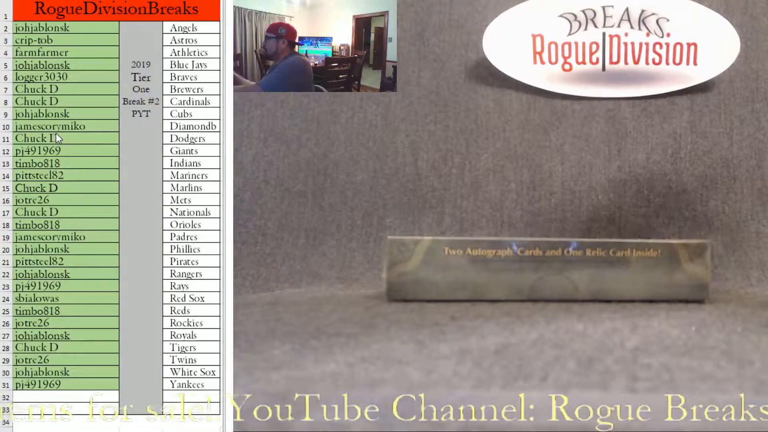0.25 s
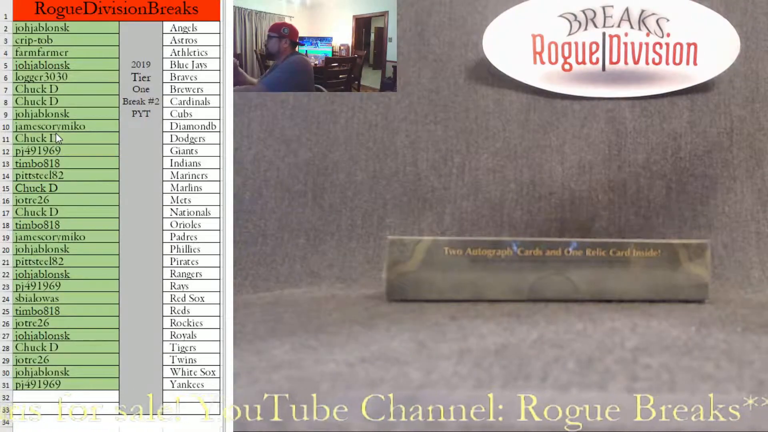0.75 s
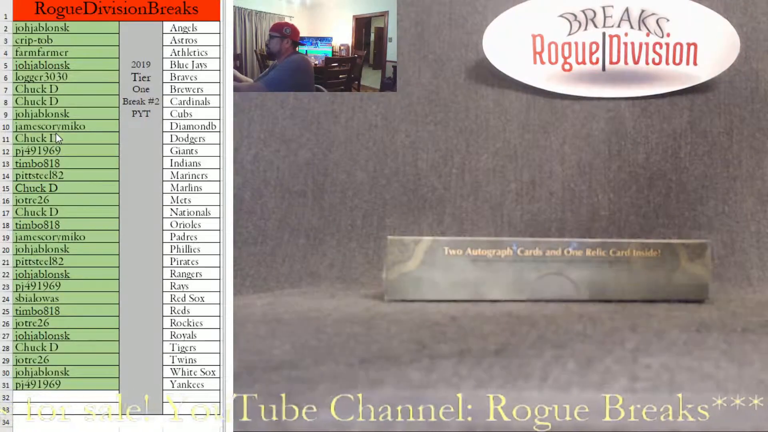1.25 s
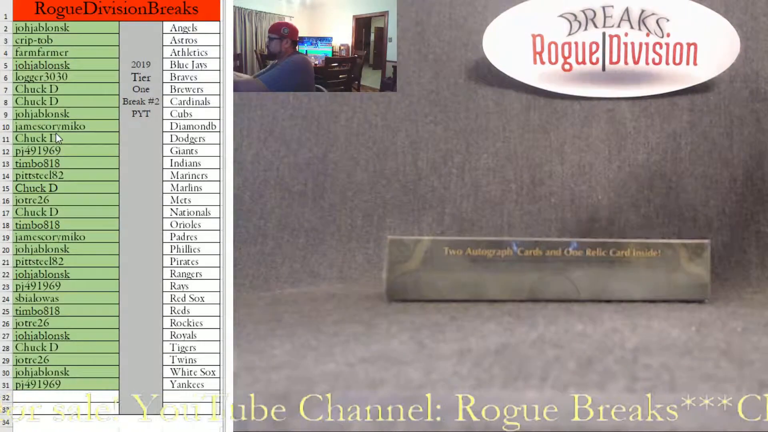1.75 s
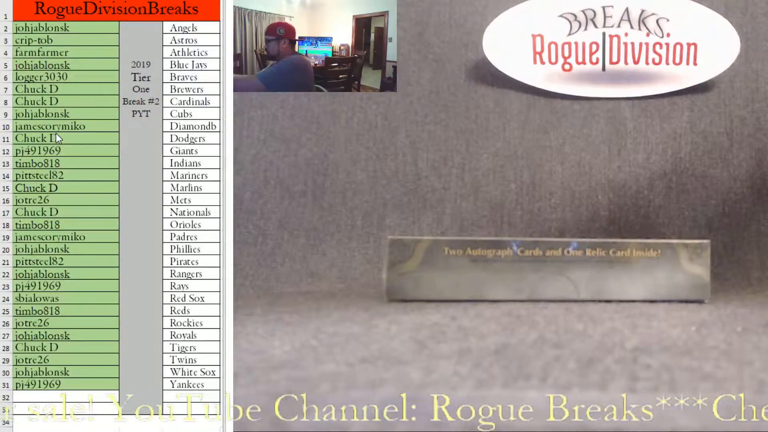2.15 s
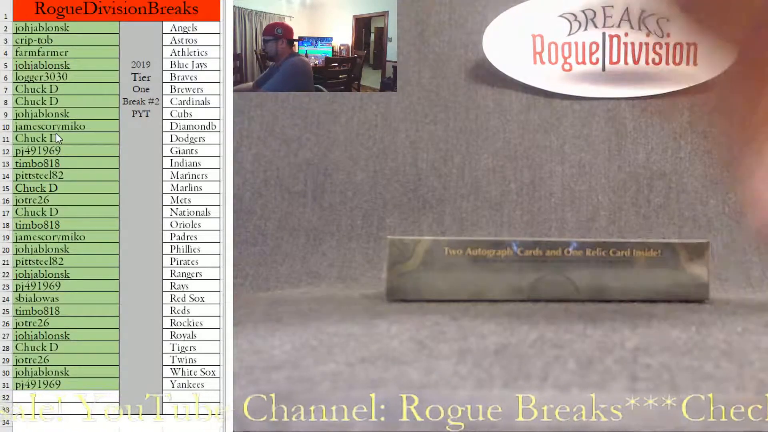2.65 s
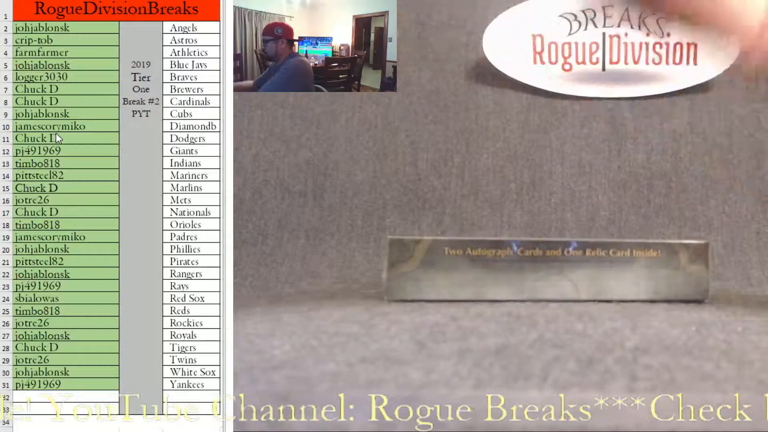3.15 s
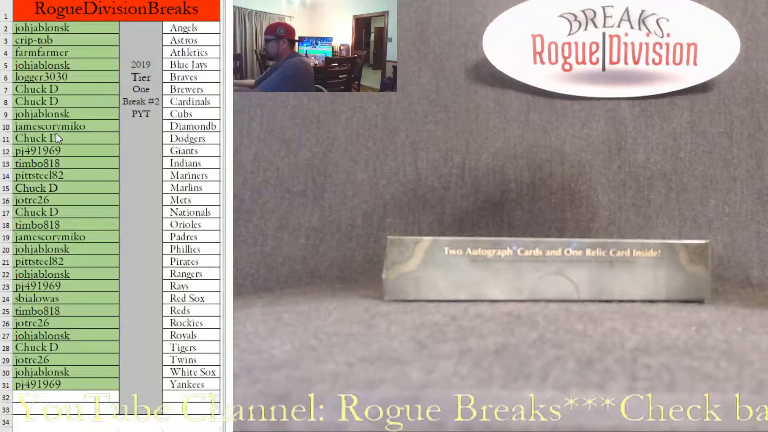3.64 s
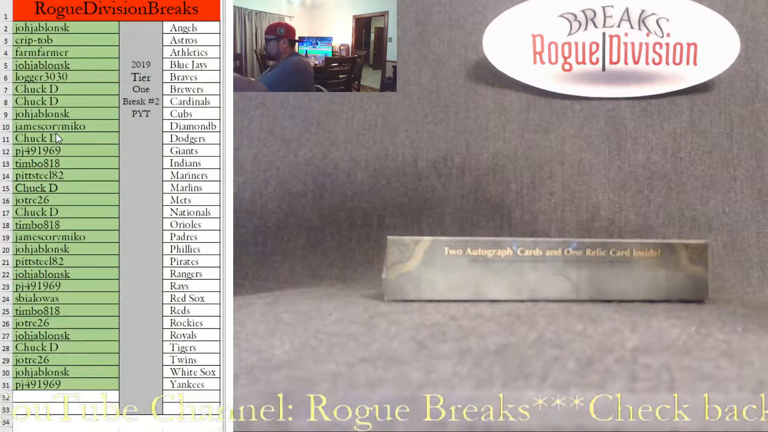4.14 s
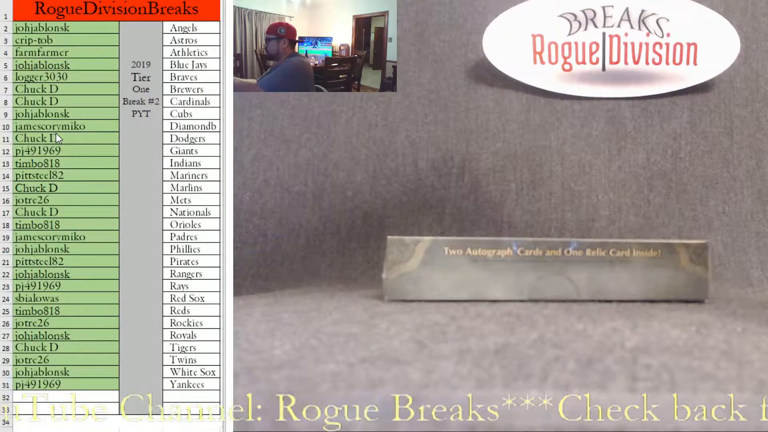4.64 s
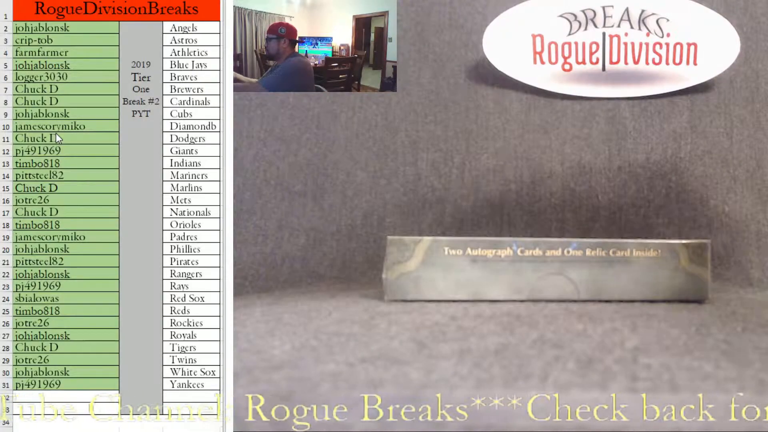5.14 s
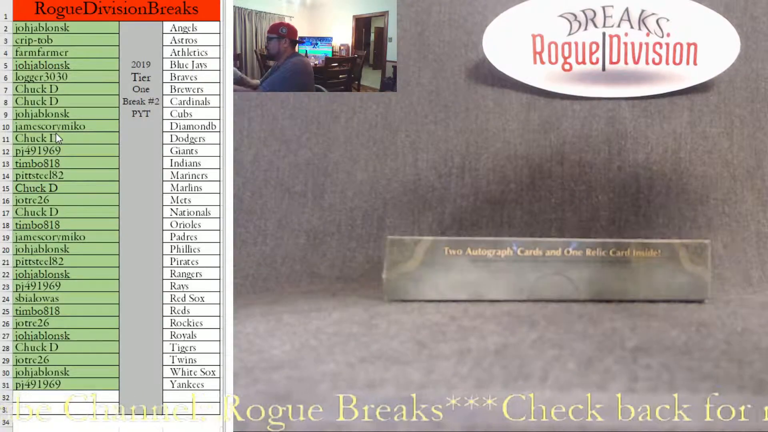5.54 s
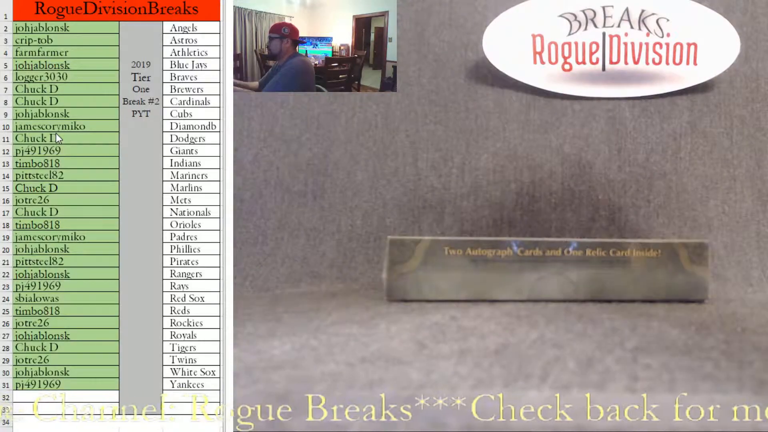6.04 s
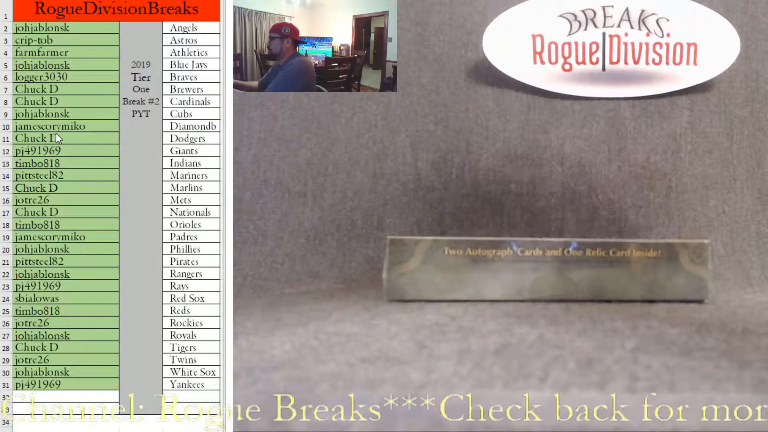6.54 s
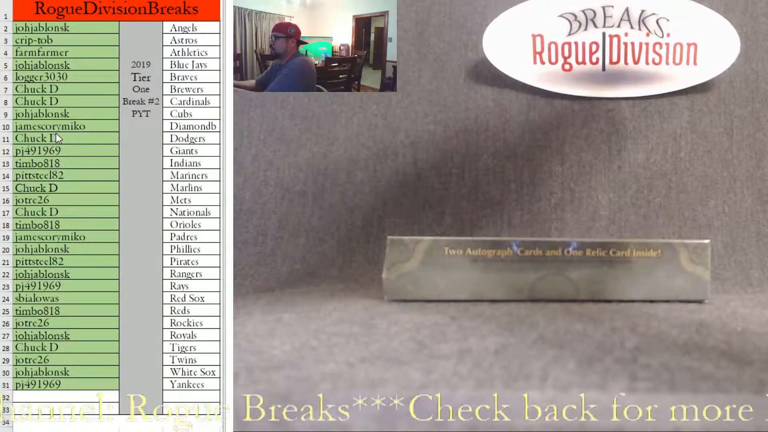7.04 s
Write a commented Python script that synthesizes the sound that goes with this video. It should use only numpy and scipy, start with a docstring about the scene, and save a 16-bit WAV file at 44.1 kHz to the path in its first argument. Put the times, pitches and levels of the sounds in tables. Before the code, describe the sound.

Thin rubber gloves crinkle and slide over hands, cuffs snapping sharply, one crack far loudest, above a low machine hum in a small room.

```python
"""Thin rubber gloves are pulled on close to a desk microphone in a small room with a steady machine hum.
First the film slides and crinkles over the skin (filtered grains of noise) and small folds flick open.
From 1.3 s the stretched cuff snaps back on the wrist (millisecond noise bursts). The hardest snap, at 2.2 s,
drives the recorder's limiter down, and the room swells back over most of a second. A hand wafts past at 2.9 s.
More snaps come around 5.1 to 5.4 s, then pulls and flicks to the end. Soft knocks and brief rings run between."""
import sys
import numpy as np
from scipy import signal
from scipy.fft import rfft, irfft
from scipy.io import wavfile
from scipy.ndimage import uniform_filter1d

SR = 44100
rng = np.random.default_rng(int(sys.argv[2]) if len(sys.argv) > 2 else 0)


def materialize(psi):
    """Save the field psi as 16-bit PCM at rate SR to the path in sys.argv[1].

    A 1-D psi becomes a single channel; in a 2-D psi each row is a channel.
    """
    bounded = np.clip(np.atleast_2d(psi).T, -1, 1)
    quanta = np.round(bounded * 32767).astype(np.int16)
    wavfile.write(sys.argv[1], SR, quanta)


N = 321489
T = np.arange(N) / SR  # time in seconds

# Levels in the tables are relative, because later steps may shift them.
# Cuff and fingertip snaps. Each row: start in seconds, level in dB, film pitch in Hz, spread in octaves,
# length in seconds, broad slap on the skin in dB, share sent to the room in dB.
SNAPS = [(1.2608, -16.5, 4940, 0.68, 0.0032, -2, 3), (1.272, -7, 4240, 0.5, 0.0026, -6, -14),
         (1.2862, -2, 5000, 0.77, 0.0023, -9, -4), (1.3377, -2, 7780, 0.43, 0.0044, -4, -5),
         (1.357, -12.5, 8040, 0.39, 0.0033, -11, 3.5), (1.682, -7, 6900, 0.72, 0.009, -17, -2.5),
         (1.984, -12.5, 4900, 0.74, 0.0073, -13, -1.5), (2.2125, -8.5, 6000, 0.58, 0.0017, -15, -9),
         (2.246, 20, 6600, 0.55, 0.002, -9, -12), (2.275, -10, 6500, 0.54, .0015, -18, -10),
         (3.595, -20.5, 6700, 1.6, 0.0036, -7, 0.5), (5.1298, -27, 8500, 0.79, .001, -30, -8),
         (5.1533, -17.5, 7340, 0.75, 0.0029, -18, -5.5), (5.1538, -21.5, 2870, 0.25, 0.0023, -20, -13),
         (5.4296, -8, 9050, 0.18, 0.00081, -19.5, -7), (5.4363, -7.5, 5830, 1.24, 0.0047, -11, -2)]
# Folds flicking open. Each row: start in seconds, level in dB, film pitch in Hz, low-mid share in dB.
FLICKS = [(0.142, -25, 7000, -30), (0.205, -26.5, 4600, -30), (0.408, -22, 6100, -12),
          (0.587, -20.5, 7200, -9), (1.066, -17.5, 5800, -4), (1.1675, -20.5, 4640, -30),
          (1.231, -21.5, 5000, -10), (1.468, -15, 4520, -14), (1.5286, -18.5, 5450, -9),
          (1.655, -19.5, 6330, -25), (2.345, -18.5, 3040, -22), (2.4057, -20, 5990, -24),
          (3.271, -12.5, 7100, -11.5), (3.458, -31.5, 11500, -30), (3.5118, -23.5, 6900, -10),
          (3.6141, -12, 6300, -19), (3.7025, -25.5, 7900, -11), (3.8152, -24, 6300, -30),
          (3.8718, -22.5, 9200, -30), (3.904, -29.5, 5770, -17), (4.359, -18, 11000, -10.5),
          (4.3714, -19.5, 6100, -20), (4.7833, -21, 6950, -36), (4.88, -28.5, 8100, -25),
          (5.2894, -25, 6880, -7), (5.323, -22.5, 9100, -23), (5.3647, -20, 8300, -21),
          (5.8407, -23, 8100, -14), (5.956, -16.5, 6200, -15), (5.9654, -20.5, 8000, -15),
          (6.1735, -23.5, 8250, -14), (6.199, -19, 9300, -17), (6.2284, -26, 7560, -7),
          (6.269, -23.5, 7040, -10), (7.1267, -22.5, 7300, -23)]
# Pulls of the film over the skin. Each row: start in seconds, length in seconds, swish level in dB,
# tightness (drag over swish) in dB.
PULLS = [(0.0, .16, -45.5, -11), (0.338, 0.3, -46.5, -11.5), (0.748, 0.06, -54.5, -8),
         (0.937, 0.13, -46.5, -8.5), (1.08, 0.15, -40.5, -5), (1.249, 0.097, -28.5, -9),
         (1.359, .11, -35.5, -6.5), (1.472, 0.25, -46.5, -2.5), (1.906, 0.098, -42.5, -3.5),
         (2.119, .12, -46, 3), (2.806, 0.063, -48.5, -5), (3.069, 0.29, -48, -11), (3.53, 0.24, -48, -8),
         (3.792, 0.15, -48, -5), (4.058, 0.52, -50, -9), (4.499, 0.17, -40, -13.5),
         (4.701, 0.22, -44.5, -12), (4.943, 0.16, -42, -14), (5.12, .11, -46, -7), (5.357, 0.11, -38, -8),
         (5.52, 0.16, -45.5, -21), (5.701, 0.56, -51.5, -11.5), (5.929, 0.098, -50, -5),
         (6.161, .15, -39.5, -10), (6.33, 0.22, -48, -10), (6.553, 0.076, -39.5, -12.5),
         (6.657, 0.053, -40.5, -10), (6.737, 0.076, -42, -18), (6.937, 0.087, -43, -4.5),
         (7.054, .13, -42.5, -10.5)]
# Tone colour of the bright swish. Each row: frequency in Hz, level in dB.
SWISH_COLOUR = [(1470, -25.5), (2500, -16.5), (3440, -17.5), (4800, 0), (5190, -3.5), (5650, 3),
                (8330, 0.5), (9580, 2.5), (10700, -2.5), (14100, -4.5), (16000, -14.5)]
# Tone colour of the lower, tight drag. Each row: frequency in Hz, level in dB.
DRAG_COLOUR = [(300, -18.5), (800, -8.5), (1300, -20), (2000, -6), (2900, -4), (4300, 3.5), (6000, -14.5),
               (10000, -29.5)]
# Tone colour of the broad slap under a snap or flick. Each row: frequency in Hz, level in dB.
SLAP_COLOUR = [(100, -9.5), (300, -0.5), (800, -6.5), (1050, -5.5), (1350, 0), (2200, -2.5), (3500, 7.5),
               (8000, 5.5), (15000, -6.5)]
# Brief rings of taut film and the air it cups. Each row: start in seconds, level in dB, pitch in Hz,
# glide in octaves per second, width in Hz, time to the peak in seconds.
RINGS = [(0.408, -24, 5820, 0, 450, 0.002), (1.067, -27.5, 203, 0, 50, 0.0047),
         (1.067, -30, 309, 0, 50, .005), (1.067, -35.5, 6600, 0, 700, 0.017),
         (1.3388, -23.5, 1407, 0, 203.5, 0.0036), (1.338, -23, 2049, 0, 878, 0.0078),
         (1.369, -35.5, 2200, -.7, 703, 0.022), (1.983, -24, 5500, 0, 500, 0.0081),
         (1.986, -29.5, 3210, 0, 700, 0.0061), (2.125, -48, 2650, 1.5, 602, 0.019),
         (2.141, -46, 7180, 0, 700, 0.029), (3.273, -37, 5260, 0, 700, 0.016),
         (3.513, -45, 3320, 0, 350, 0.0038), (4.221, -51.5, 4840, -2, 450, 0.038),
         (5.436, -40, 401, 0, 200, 0.0091)]
# Soft knocks of the hands. Each row: start in seconds, level in dB, pitch in Hz, scuff in dB, decay in seconds.
BUMPS = [(0.207, -46.5, 364, -21, 0.019), (0.588, -28, 242, -8, 0.013), (1.274, -24.5, 186, -11, 0.013),
         (1.34, -32.5, 334, 2, 0.012), (1.985, -25.5, 222.5, -18, 0.012), (3.271, -27.5, 287, -11, 0.0076),
         (3.612, -32, 272, 2, 0.01), (5.435, -29.5, 388, 1, 0.0072), (6.189, -33.5, 175, -5, 0.013),
         (6.229, -37, 172, 1, 0.0094), (6.993, -34, 254, 1, 0.011), (7.153, -24.5, 290, -10, 0.0062)]
# Air pushed at the microphone by a passing hand. One row: middle in seconds, level in dB, length in seconds.
WAFT = (2.9, -22, 0.054)
# Presence of the desk and microphone, heard on every glove sound. Each row: frequency in Hz, level in dB.
PRESENCE = [(1000, -2), (2900, -2), (3500, -8.5), (4200, -5), (5200, -8.5), (6500, -7), (8700, -5),
            (10800, -7), (14000, -3), (16000, -6)]
# How long the room rings. Each row: frequency in Hz, time to fade by 60 dB in seconds.
ROOM_FADE = [(200, 0.45), (1400, 0.47), (4000, 0.38), (8000, 0.34), (15000, 0.23)]
# Tone colour of the fan air. Each row: frequency in Hz, level in dB.
AIR_COLOUR = [(100, -26), (170, -5.5), (250, -5.5), (400, -15), (600, -24.5), (950, -26.5), (1250, -17.5),
              (1900, -29), (3400, -25.5), (4200, -24), (5300, -27), (8500, -24), (10700, -30),
              (14300, -30.5), (16000, -37.5)]
# Tone colour of the low rumble. Each row: frequency in Hz, level in dB.
RUMBLE_COLOUR = [(18, -23.5), (28, -5), (35, -0.5), (50, 0.5), (62, -19), (74, -11), (84, -3.5), (98, -8),
                 (108, -18), (135, -7.5), (155, -15), (220, -28.5), (400, -57)]
# Machine hum; the two lowest tones beat. Each row: frequency in Hz, level in dB.
HUM = [(40.05, -42), (47.15, -34.5), (237, -59)]
# Middle level of the drone over time. Each row: time in seconds, level in dB.
DRONE_LEVEL = [(0, -45), (1.0, -46), (1.9, -40), (2.7, -38), (3.25, -34), (3.6, -46), (4.15, -39.5),
               (4.8, -45.5), (7.29, -50.5)]

PULL_ATTACK_S, PULL_RELEASE_S = 0.018, 0.033
RESTING_DB = -62  # between pulls the film barely stirs
AIR_DB, RUMBLE_DB = -52.5, -39.5
DRONE_HZ, DRONE_SAG_HZ_PER_S = 129.6, 1.4  # starting pitch and how fast it sinks
TOP_HZ = 16000  # the recorder keeps little above this


def undb(db):
    """Turn decibels into gain."""
    return 10 ** (np.asarray(db) / 20)


def unit(x):
    """Scale to an average (rms) strength of 1."""
    return x / np.sqrt(np.mean(x ** 2) + 1e-20)


def on_log_axis(points, hz):
    """Read (Hz, value) points at any frequencies, with pitch spaced as we hear it."""
    f, value = np.transpose(points)
    return np.interp(np.log(hz + 1), np.log(f), value)


def colour(x, points):
    """Filter with a smooth response given as (Hz, dB) points."""
    gain = undb(on_log_axis(points, np.fft.rfftfreq(len(x), 1 / SR)))
    return irfft(rfft(x) * gain, len(x))


def noise(size=N):
    """Plain white noise."""
    return rng.standard_normal(size)


def walk(rate):
    """Slow random wandering with rms 1, taking `rate` new values a second."""
    k = int(SR / rate)
    steps = np.repeat(noise(N // k + 1), k)
    smooth = uniform_filter1d(uniform_filter1d(steps, k), k)
    return unit(smooth[:N])


def add(track, s, sound):
    """Mix a (direct, room) pair into a track at a time in seconds."""
    i = max(int(s * SR), 0)
    track[:, i:i + sound.shape[1]] += sound[:, :N - i]


def crack(hz, octaves, length, slap_db, size=2048):
    """The film flaps for a few ms round its own pitch, over a broad slap.
    Returns the jagged wave toward the microphone and the smooth average over all directions for the room."""
    t, f = np.arange(size) / SR, np.fft.rfftfreq(size, 1 / SR)
    octaves_away = np.log2((f + 1) / hz)
    film = unit((1 + (octaves_away / octaves) ** 2) ** -1.5)
    slap = undb(slap_db) * unit(undb(on_log_axis(SLAP_COLOUR, f)))
    spectrum = np.hypot(film, slap)
    envelope = (1 - np.exp(-t / 0.0008)) * np.exp(-(t / length) ** 2)
    burst = irfft(rfft(noise(size)) * spectrum) * envelope
    # a short smooth pulse, moved 32 samples late so that its first half fits
    average = np.roll(irfft(spectrum), 32) * (t < 0.003)
    return np.array([unit(burst), unit(average)]) * np.sqrt(length * SR / size)


def snaps():
    """Stretched rubber whips back on the skin; gives the direct sound and what enters the room."""
    out = np.zeros((2, N))
    for s, db, hz, octaves, length, slap_db, room_db in SNAPS:
        add(out, s, undb([[db], [db + room_db]]) * crack(hz, octaves, length, slap_db))
    return out


def flicks(gain_db=-3.0, slap_db=7, length=0.0024, size_exponent=0.43, octaves=0.8, room_db=-4):
    """Small folds pop over, the smallest fastest: quieter pops are shorter."""
    out = np.zeros((2, N))
    typical_db = np.median([row[1] for row in FLICKS])
    for s, db, hz, low_db in FLICKS:
        pop_length = length * undb(db - typical_db) ** size_exponent
        pop = crack(hz, octaves, pop_length, min(low_db + slap_db, 0))
        add(out, s, undb(gain_db) * undb([[db], [db + room_db]]) * pop)
    return out


def stroke(start, length):
    """Speed of one pull: it speeds up, holds and dies away."""
    attack = np.clip((T - start) / PULL_ATTACK_S, 0, 1)
    release = np.exp(-np.maximum(T - start - length, 0) / PULL_RELEASE_S)
    return attack * release


def slips(rate, scatter_db, rub):
    """Many tiny stick-slip releases over a smooth rub; scatter makes their strengths more uneven."""
    size = undb(scatter_db * np.minimum(rng.exponential(size=N), 4))
    happens = rng.random(N) < rate / SR  # `rate` releases a second on average
    grains = happens * size * noise()
    return unit(unit(grains) + rub * noise())


def sliding(swish_db=0.0, drag_db=-1, room_db=-4, flutter_db=2.5):
    """Each pull drags the film over the skin: a bright crinkly swish, and a lower rasp where it is tight."""
    swish_power, drag_power = undb(RESTING_DB) ** 2, 0
    for start, length, db, tight_db in PULLS:
        power = (undb(db) * stroke(start, length)) ** 2
        swish_power = swish_power + power
        drag_power = drag_power + power * undb(tight_db) ** 2
    swish = unit(colour(slips(rate=1100, scatter_db=0.0, rub=0.7), SWISH_COLOUR))
    drag = unit(colour(slips(rate=340, scatter_db=1.5, rub=0.61), DRAG_COLOUR))
    swish = undb(swish_db) * np.sqrt(swish_power) * swish
    drag = undb(drag_db) * np.sqrt(drag_power) * drag
    return (swish + drag) * undb(flutter_db * walk(50)) * undb([[0], [room_db]])


def crinkles(over_pull_db=9, scatter_db=3, hz=5500, pitch_octaves=0.65, octaves=0.6, length=0.0015,
             slap_db=-14, room_db=-4, count=2):
    """Each pull pops a few tiny creases at chance moments, louder the harder it is."""
    out = np.zeros((2, N))
    for start, span, db, _ in PULLS:
        moments = rng.random(count)
        variations = rng.uniform(-0.7, 1, (count, 2))
        for when, (size, pitch) in zip(moments, variations):
            pop = crack(hz * 2 ** (pitch_octaves * pitch), octaves, length, slap_db)
            gain = undb(db + over_pull_db + scatter_db * size)
            add(out, start + when * span, gain * undb([[0], [room_db]]) * pop)
    return out


def rings(gain_db=-1, room_db=-4, size=12288):
    """A heavily damped resonance of the stretched glove, kept going by the rubbing: half tone, half hiss."""
    out, t = np.zeros((2, N)), np.arange(size) / SR
    for s, db, hz, glide, width_hz, rise in RINGS:
        # slow complex noise makes the tone waver; its first half lets the filter settle
        lowpass = signal.butter(2, width_hz / 2, fs=SR)
        rub = signal.lfilter(*lowpass, noise(2 * size) + 1j * noise(2 * size))[size:]
        swell = t / rise * np.exp(1 - t / rise)
        turns = np.cumsum(hz * 2 ** (glide * t)) / SR
        tone = swell * np.real(rub * np.exp(2j * np.pi * turns))
        level = undb(db + gain_db) * np.sqrt(np.mean(swell ** 2))
        add(out, s, level * undb([[0], [room_db]]) * unit(tone))
    return out


def bumps(gain_db=-3, room_db=-4, skin_db=-5, size=4096):
    """Hand meets hand: a dull, quickly damped knock with a scuff of skin."""
    out, t = np.zeros((2, N)), np.arange(size) / SR
    scuff_colour = [(300, -24.0), (700, -9.5), (1350, 13.5), (2200, -11.0), (5000, -37)]
    for s, db, hz, scuff_db, decay in BUMPS:
        body_colour = [(hz / 3, -25), (hz * 0.8, -2), (hz, 0), (hz * 2, -12), (hz * 4, -20), (hz * 12, -50)]
        body = unit(colour(noise(size), body_colour))
        scuff = undb(min(scuff_db, 3) + skin_db) * unit(colour(noise(size), scuff_colour))
        knock = (body + scuff) * (1 - np.exp(-t / 0.0012)) * np.exp(-t / decay)
        add(out, s, undb(db + gain_db) * undb([[0], [room_db]]) * knock)
    return out


def waft():
    """A hand sweeps past the microphone and pushes a little air at it: a soft low gust."""
    s, db, length = WAFT
    gust = unit(colour(noise(), [(15, -28), (28, -1), (40, -9.0), (60, -33), (200, -69)]))
    return undb(db) * gust * np.exp(-((T - s) / length) ** 2)


def room(x, size=24576):
    """Strong early returns from desk and walls, then a short tail whose treble dies first."""
    t, f = np.arange(size) / SR, np.fft.rfftfreq(size, 1 / SR)
    spectrum, tail = rfft(noise(size)), 0
    for hz, fade_s in ROOM_FADE:
        # each band blends smoothly into its neighbours
        share = on_log_axis([(other, float(other == hz)) for other, _ in ROOM_FADE], f)
        tail = tail + irfft(spectrum * share) * np.exp(-np.log(1000) * t / fade_s)
    early_boost = 1 + 1.46 * np.exp(-t / 0.018)
    tail = tail * (t > 0.002) * early_boost
    return signal.fftconvolve(x, tail / np.sqrt(np.sum(tail ** 2)))[:N]


def drone():
    """A drone through the walls sinks slowly in pitch, wavers, and swells and fades."""
    s, db = np.transpose(DRONE_LEVEL)
    pitch_hz = DRONE_HZ - DRONE_SAG_HZ_PER_S * T + 1.0 * walk(6)
    tone = unit(np.sin(2 * np.pi * np.cumsum(pitch_hz) / SR))
    return undb(np.interp(T, s, db) + 2.4 * walk(6)) * tone


def background():
    """Fan air and low rumble are filtered noise; the machine hum is steady tones, joined by the drone."""
    air = undb(AIR_DB + 1.0 * walk(9.4)) * unit(colour(noise(), AIR_COLOUR))
    rumble = undb(RUMBLE_DB) * unit(colour(noise(), RUMBLE_COLOUR + [(2000, -100)]))
    hum = sum(undb(db) * unit(np.sin(2 * np.pi * (hz * T + rng.random()))) for hz, db in HUM)
    return air + rumble + hum + drone()


def scene():
    """The gloves, their reflections and the room's own sound."""
    direct, sent = snaps() + flicks() + sliding() + crinkles() + rings() + bumps()
    gloves = colour(direct + room(sent), PRESENCE)
    return (gloves + waft() + background())[None]


def record(dry, threshold_db=-3, release_db_per_s=19, size=88):
    """A limiter drops at once on overload and recovers slowly; what is left over clips."""
    power = uniform_filter1d(dry[0] ** 2, size)  # averaged over about 2 ms
    level_db = 10 * np.log10(np.maximum(power, 1e-12))
    over_db = np.maximum(level_db - threshold_db, 0)
    # hold the largest cut so far, letting go at a steady rate
    recovered_db = release_db_per_s * T
    cut_db = np.maximum.accumulate(over_db + recovered_db) - recovered_db
    clipped = np.clip(dry * undb(-cut_db), -1, 1)
    lowpass = signal.ellip(8, 0.2, 70, TOP_HZ, fs=SR, output="sos")
    return signal.sosfilt(lowpass, clipped)


dry = scene()
out = record(dry)
materialize(out)
```